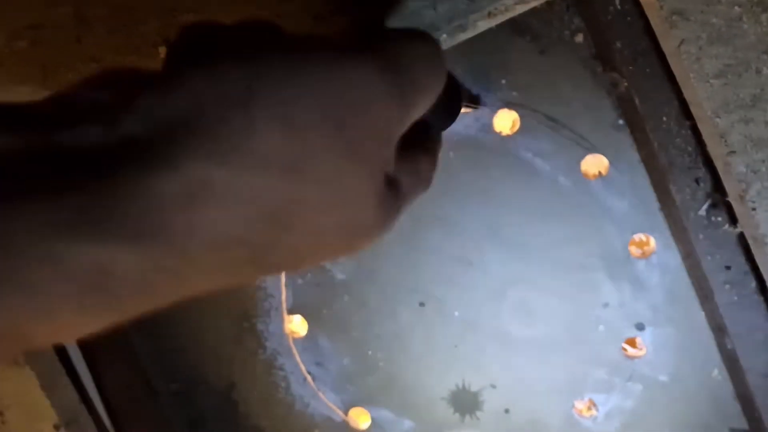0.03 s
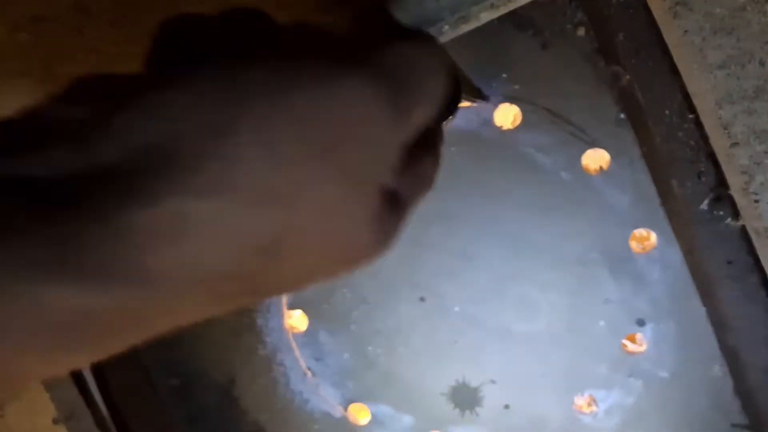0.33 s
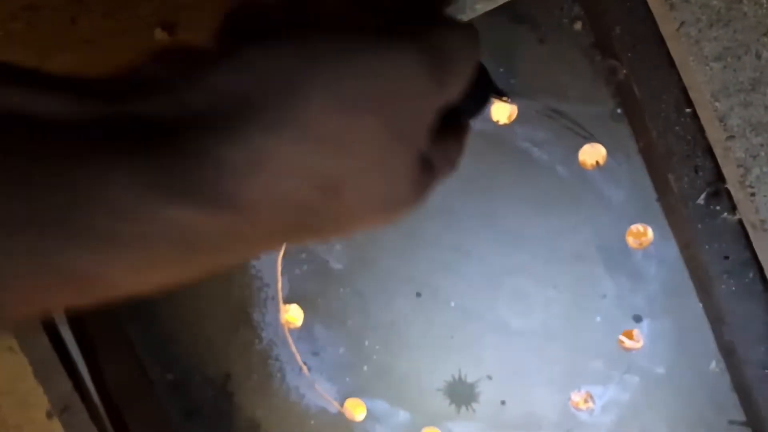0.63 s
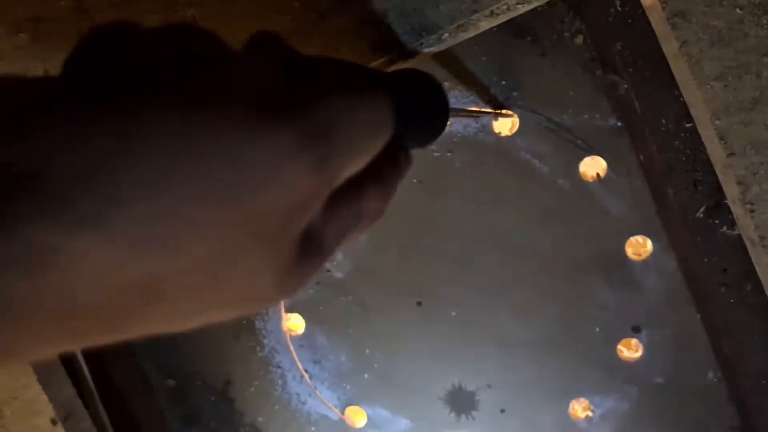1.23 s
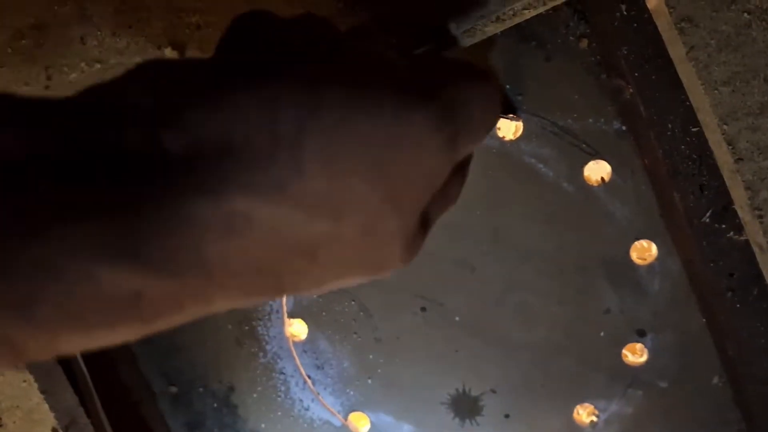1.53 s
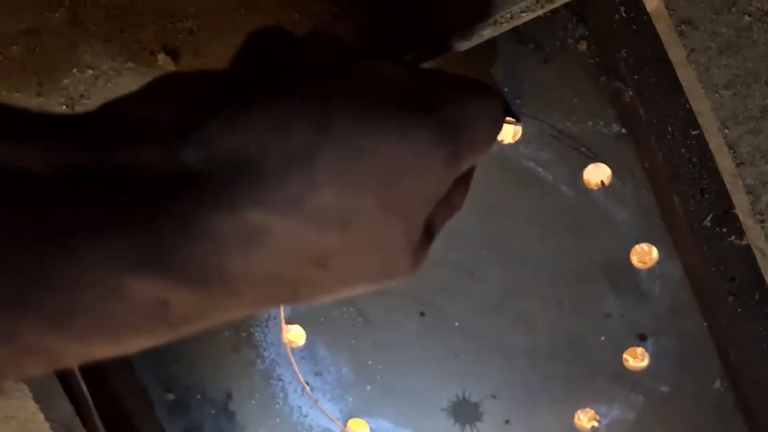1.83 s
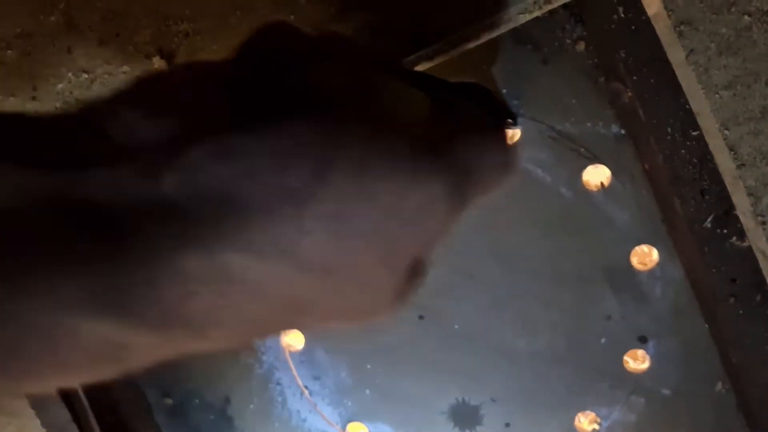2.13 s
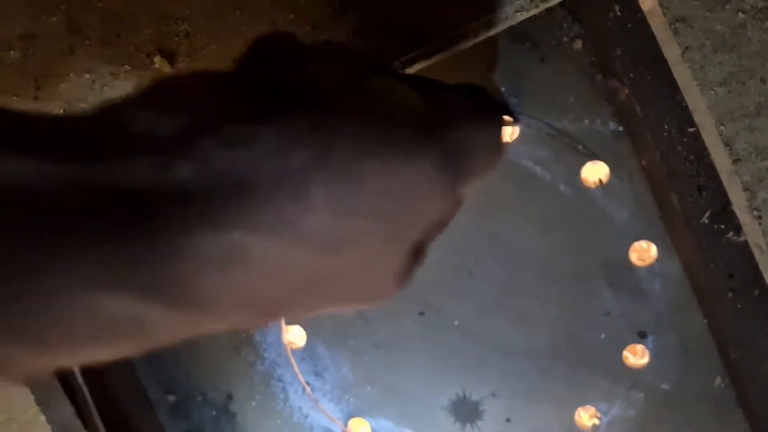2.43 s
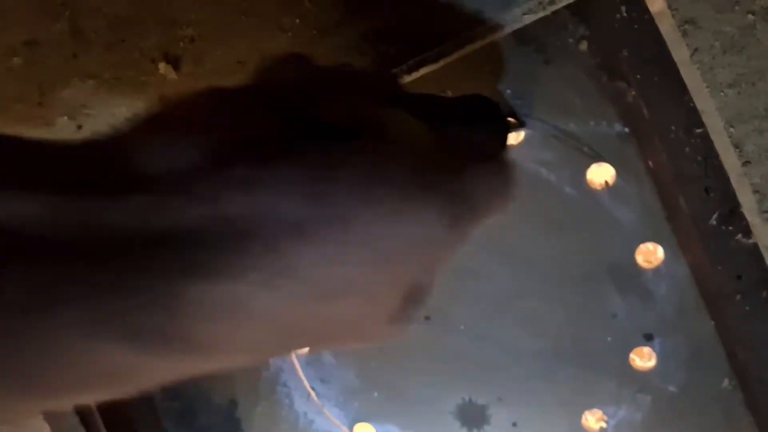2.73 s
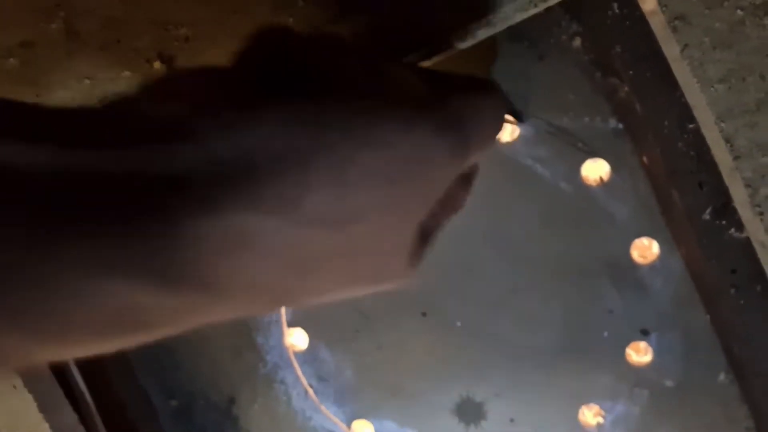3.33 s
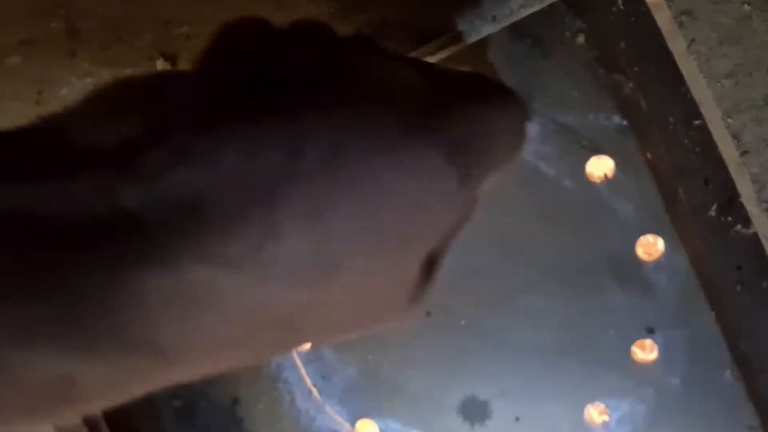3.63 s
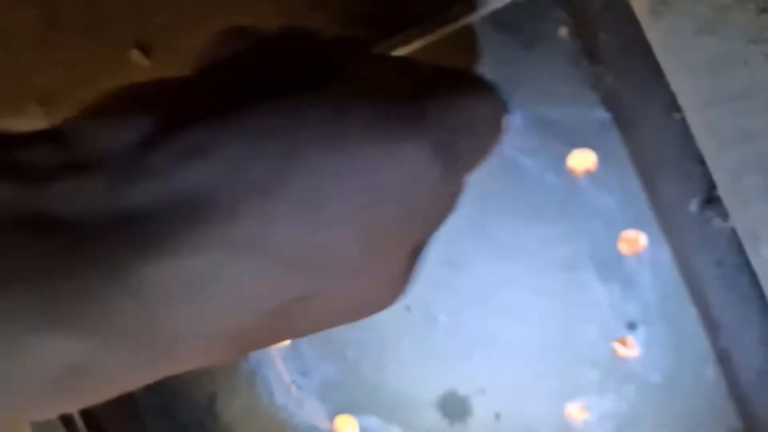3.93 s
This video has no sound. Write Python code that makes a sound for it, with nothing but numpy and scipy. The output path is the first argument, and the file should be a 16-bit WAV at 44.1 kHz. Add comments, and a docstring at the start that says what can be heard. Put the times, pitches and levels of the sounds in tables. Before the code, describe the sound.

A small hand saw rasps through a ceiling board close by, each short, uneven stroke crunching and making the panel boom. Knocks land around 0.3 and 0.4 seconds, and the blade snags with a click near 0.7. From 0.9 to 1.4 it slides back slowly, hissing faintly and ticking twice. Irregular strokes then continue until 4 seconds, with lighter knocks near 2.6 and 2.8, in a quiet, slightly echoing attic.

```python
"""Short, uneven strokes of a small hand saw tear through a ceiling board, close by in an attic.
Each catch of the teeth shakes the whole panel, crunches the board and sheds grit.
Now and then the saw knocks, or the blade snags with a click. About a second in, it is drawn slowly
back along the cut, hissing and ticking. A short echo and still attic air lie behind it."""
import sys
import numpy as np
from scipy import signal
from scipy.fft import rfft, irfft
from scipy.io import wavfile
from scipy.ndimage import uniform_filter1d

SR = 44100
rng = np.random.default_rng(int(sys.argv[2]) if len(sys.argv) > 2 else 0)


def master(y):
    """Save y as 16-bit WAV."""
    cut = np.clip(np.atleast_2d(y).T, -1, 1)
    pcm = np.round(cut * 32767)  # scale
    wavfile.write(sys.argv[1], SR, pcm.astype(np.int16))


N = 176400

# The saw, close to the microphone. Each row: start, hardest push and end in seconds,
# relative levels of grit, crunch and panel in dB, tooth catches per second at full force.
STROKES = [(-.05, 0, 0.087, -42, -34.5, -13, 82), (0.096, 0.113, .165, -49, -40.5, -19.5, 78.8),
           (0.246, 0.281, .33, -39, -30.5, -13, 84.7), (0.374, 0.418, .48, -38.5, -27, -13, 77.3),
           (.485, 0.528, 0.56, -46, -38, -18, 72), (0.539, 0.569, 0.62, -37.5, -33, -18.5, 95.3),
           (0.628, 0.671, 0.742, -45.5, -32.5, -19, 80), (0.739, 0.78, .87, -51, -39, -16.5, 72.8),
           (1.323, 1.347, 1.44, -60.5, -57, -56, 76), (1.412, 1.538, 1.606, -50, -41.5, -28.5, 77),
           (1.618, 1.653, 1.745, -56, -51, -31, 72), (1.751, 1.813, 1.896, -44.5, -37, -20.5, 79.5),
           (1.897, 1.947, 2.028, -44, -38.5, -17, 72), (2.059, 2.087, 2.126, -54, -42, -26.5, 68),
           (2.192, 2.231, 2.29, -45, -43.5, -18, 70), (2.291, 2.394, 2.425, -42.5, -33.5, -9, 73),
           (2.449, 2.514, 2.583, -45, -39.5, -13.5, 67.3), (2.6, 2.648, 2.722, -42, -31.5, -11, 80),
           (2.74, 2.805, 2.84, -41.5, -37.5, -12, 72), (2.868, 2.887, 2.913, -50, -41.5, -28, 66),
           (3.032, 3.056, 3.04, -47.5, -40, -21, 72.5), (3.074, 3.104, 3.143, -45, -39.5, -14, 68.5),
           (3.15, 3.239, 3.324, -41.5, -29, -10.5, 83.3), (3.294, 3.384, 3.435, -41.5, -36, -11, 76),
           (3.449, 3.48, 3.467, -46, -39, -30.5, 77), (3.598, 3.672, 3.68, -41, -35.5, -18, 81.4),
           (3.712, 3.724, 3.79, -46, -41.5, -22.5, 68), (3.742, 3.791, 3.848, -38, -27, -14.5, 82.4),
           (3.863, 3.941, 4.05, -41.5, -33.5, -15.5, 93)]
# Where the cut sits, mostly a little to the right. Each row: frequency in Hz, left over right in dB.
CUT_BALANCE = [(250, 7.5), (470, -7.5), (740, -3), (2000, -0.5), (4500, -3), (15000, -2.5)]
def sawing(grit_db=-6, crunch_db=-2, panel_db=1):
    """The strokes tear the board and shake it. Gives the sound at the cut and the panel's boom."""
    drive = np.zeros((3, N))
    for row in STROKES:
        add(drive, row[0], stroke(*row))
    grit_drive, crunch_drive, shake = drive
    cut = amp(grit_db) * grit(grit_drive) + amp(crunch_db) * crunch(crunch_drive)
    balance = sides(read(CUT_BALANCE, np.fft.rfftfreq(N, 1 / SR)))
    return irfft(rfft(cut) * balance, N), amp(panel_db) * shake


def stroke(start, hardest, end, grit_db, crunch_db, panel_db, rate, bite_s=.0036, spread_db=3.5):
    """Force swells and eases as teeth catch. Gives grit strength, crunch strength and panel motion."""
    t = start + np.arange(SR // 2) / SR
    progress = np.interp(t, [start, hardest, end], [0, .5, 1])
    force = np.maximum(np.sin(np.pi * progress), 0) ** .9
    jitter, size = rng.standard_normal((2, 60))
    teeth_passed = np.cumsum(rate * (.85 + .15 * force)) / SR
    at = np.searchsorted(teeth_passed, np.arange(len(size)) + .5 + .08 * jitter)
    catches = np.bincount(at, amp(spread_db * size), len(t) + 1)[:len(t)]
    # each catch tears for a moment, over steady scraping
    bite = signal.lfilter([1], [1, -np.exp(-1 / (bite_s * SR))], catches)
    bite /= np.sqrt(np.average(bite ** 2, weights=force) + 1e-12)
    upper = (rate / PANEL_MODES[0][0]) ** 3.6  # faster catches shake the upper modes harder
    shake = panel(catches * force ** 1.93, upper)
    shake /= np.sqrt(uniform_filter1d(shake ** 2, size=1300).max() + 1e-12)
    return np.array([amp(grit_db) * force ** .8 * (.75 + .25 * bite),
                     amp(crunch_db) * force ** 1.52 * (.55 + .45 * bite),
                     amp(panel_db) * shake])


# The ceiling panel's modes. Each row: frequency in Hz, level in dB, seconds to fall by 60 dB.
PANEL_MODES = [(69.93, 15.5, .19), (93, -0.5, .16), (120.4, 4.5, 0.28), (147.46, 2, .24), (243, -15, 0.18),
               (309.5, -10.5, 0.23)]
def panel(push, upper=1, soft_hz=293):
    """The panel's low modes ring after each soft push; upper scales all but the lowest."""
    t = np.arange(SR // 3) / SR
    shifts = 1 + .05 * rng.uniform(-1.08, 1, len(PANEL_MODES))  # the saw's pressure retunes the panel
    modes = [amp(db) * decay(t, t60) * np.sin(2 * np.pi * hz * shift * t)
             for (hz, db, t60), shift in zip(PANEL_MODES, shifts)]
    soft_push = signal.sosfilt(signal.butter(3, soft_hz, fs=SR, output="sos"), push)
    return signal.fftconvolve(soft_push, modes[0] + upper * sum(modes[1:]))[:len(push)]


# The board, right at the cut. Each row: frequency in Hz, level in dB.
CRUNCH_SPECTRUM = [(120, -20.5), (250, 3.5), (320, 5), (390, -21.5), (440, -21), (478, -1), (540, -8),
                   (610, 5), (675, 6), (780, -2), (860, -5.5), (940, -6), (1150, -11), (1350, -24.5),
                   (1520, -18), (1900, -29.5), (3500, -34)]
def crunch(strength, width=.58):
    """The board crumbles in dense clicks, spread between the ears by a very short scatter."""
    crumbs = strength * grains(per_s=2600, spread_db=2)
    return colour(crumbs + width * scatter(crumbs, t60=.0044), CRUNCH_SPECTRUM)


# Grit at the teeth, from close up. Each row: frequency in Hz, level in dB.
GRIT_SPECTRUM = [(300, -11), (1000, 3.5), (1500, 5), (1850, 3.5), (2350, 7), (3000, 1), (4400, 5.5),
                 (6100, -1.5), (8000, -1), (10500, -6.5), (13000, -8), (16000, -18)]
def grit(strength):
    """The teeth shed fine grains, a bright rasp that rings through the blade."""
    rasp = strength * mottle(fizz(grains(per_s=3300, spread_db=3.5), t60=.028))
    return blade(colour(rasp, GRIT_SPECTRUM))


# Broad resonances of the blade under load. Each entry: frequency in Hz, before the cut bends it.
BLADE_MODES = [1410, 2270, 3810, 4414, 5030, 5940, 7470]
def blade(rasp, ring_db=4, width_hz=160, jump=.06, glide_per_s=.5):
    """Each stroke pinches the steel at a new place: its resonances jump, then glide up or down."""
    t = np.arange(N) / SR
    bends = np.ones((len(BLADE_MODES), N))
    for k, (start, _, end, *_) in enumerate(STROKES):
        begun = t >= start
        travel = (-1) ** k * np.minimum(t[begun] - start, end - start)
        bends[:, begun] = 1 + jump * rng.standard_normal((len(BLADE_MODES), 1)) + glide_per_s * travel
    pole, ring = np.exp(-np.pi * width_hz / SR), 0
    for hz, bend in zip(BLADE_MODES, bends):
        carrier = np.exp(2j * np.pi * np.cumsum(hz * bend) / SR)
        envelope = signal.lfilter([1 - pole], [1, -pole], rasp / carrier + 1e-18)
        ring += 2 * (carrier * envelope).real
    return rasp + amp(ring_db) * ring


def mottle(rasp, depth_db=3.5):
    """Ever different teeth touch the board, so narrow patches of the rasp flare and fade."""
    spectra = signal.stft(rasp, nperseg=1024, noverlap=768)[2]
    patches = rng.standard_normal(spectra.shape[1:])
    for axis in (0, 1):
        patches = uniform_filter1d(patches, size=4, axis=axis)
    spectra *= amp(depth_db * unit(patches))
    return unit(signal.istft(spectra, nperseg=1024, noverlap=768)[1][:, :N])


# The saw knocks against the board, dead centre. Each row: start in seconds, peak level in dB.
KNOCKS = [(0.299, -3.5), (0.395, -4.5), (.649, -12), (2.642, -13), (2.843, -18.5)]
def knocks():
    """Single hard catches thump the panel and favour its upper modes."""
    out = np.zeros(N)
    thump = panel(signal.unit_impulse(SR // 3), upper=1.3)
    for start, db in KNOCKS:
        add(out, start, amp(db) * thump / abs(thump).max())
    return out


# Snags near the microphone. Each row: start in seconds, level in dB, treble tilt in dB per octave,
# left over right in dB.
SNAGS = [(0.58, -34, -6, 4), (0.595, -32, 16, -1), (.642, -36, -1.5, -6), (0.654, -32.5, 4, -2),
         (.661, -21.5, 2, -3.5), (2.098, -41, -1.5, -3), (2.661, -29, 4, -1), (2.79, -38, -1.5, 5),
         (2.942, -46.5, -2, -2), (3.058, -38, -2, 4), (3.647, -37, -3, 6)]
def snags():
    """Short cracks as the blade jerks free."""
    out = np.zeros((2, N))
    for start, db, tilt_db, lean_db in SNAGS:
        add(out, start, amp(db) * sides(lean_db) * crack(t60=.055, tilt_db=tilt_db))
    return out


# The blade's crack at close range. Each row: frequency in Hz, level in dB.
CRACK_SPECTRUM = [(300, -13), (700, 12.5), (1700, -3), (2300, 0.5), (2900, -6), (4300, 1), (5600, -1),
                  (7500, -1.5), (10000, -7.5), (16000, -14)]
def crack(t60, tilt_db=0):
    """The steel lets go in a dry, fast-dying burst of noise."""
    t = np.arange(SR // 10) / SR
    return colour(rng.standard_normal((2, len(t))) * decay(t, t60), CRACK_SPECTRUM, tilt_db)


# Ticks during the slow draw. Each row: start in seconds, level in dB.
TICKS = [(.993, -43), (1.257, -47)]
def ticks(ping_hz=2300, width_hz=160, ping_db=11):
    """A lone tooth plucks the free blade: a dry crack with a short, impure ping."""
    out = np.zeros((2, N))
    for start, db in TICKS:
        pluck = crack(t60=.06)
        ping = signal.lfilter(*signal.iirpeak(ping_hz, ping_hz / width_hz, fs=SR), pluck)
        add(out, start, amp(db) * (pluck + amp(ping_db) * ping))
    return out


# The flat of the blade rubbing, just left of centre. Each row: time in seconds, level in dB.
SLIDE_LEVELS = [(0, -44), (.16, -54), (.22, -64), (.5, -48), (.9, -55), (1.2, -57), (1.25, -68),
                (1.29, -80), (1.47, -63.5), (2.03, -50), (2.18, -59.5), (2.73, -59.5), (2.98, -84),
                (4, -69)]
# Its hiss. Each row: frequency in Hz, level in dB.
SLIDE_SPECTRUM = [(300, -6), (1200, 0), (2250, 2), (2800, -2), (3500, 9), (4600, -1), (5550, 2.5),
                  (6400, -4), (7300, 1.5), (8500, -5), (10800, -7), (12500, -1.5), (16000, -9)]
def slide(lean_db=2, turn_dip=.7, turn_s=.02):
    """Fine dry hiss of steel rubbing along the cut; it dips as the saw turns round."""
    dust = mottle(fizz(grains(per_s=5300, spread_db=2), t60=.044))
    t = np.arange(N) / SR
    dips = [1 - turn_dip * np.exp(-((t - start) / turn_s) ** 2) for start, *_ in STROKES]
    return np.prod(dips, axis=0) * level(SLIDE_LEVELS) * sides(lean_db) * colour(dust, SLIDE_SPECTRUM)


# A faint rumble beneath the saw. Each row: time in seconds, level in dB.
TREMBLE_LEVELS = [(.95, -45), (1.23, -41.5), (2.2, -41), (3, -48)]
def tremble():
    """The panel trembles under the resting hand."""
    return level(TREMBLE_LEVELS) * unit(panel(rng.standard_normal(N)))


# Room tone of the attic, all around the microphone. Each row: frequency in Hz, relative level in dB.
AIR_SPECTRUM = [(20, -14), (60, 28), (200, 2), (500, -1), (2000, -15), (16000, -33.5)]
def attic_air(db=-50):
    """Still air: a low, steady noise, mostly the same in both ears."""
    noise = rng.standard_normal(N) + .5 * rng.standard_normal((2, N))
    return amp(db) * unit(colour(noise, AIR_SPECTRUM))


def grains(per_s, spread_db):
    """Random clicks of uneven size."""
    size = amp(spread_db * np.minimum(rng.exponential(1, N), 4))
    return unit(size * rng.choice([-1, 1], N) * (rng.random(N) < per_s / SR))


def fizz(clicks, t60):
    """Each click becomes a tiny dying burst, different for each ear."""
    power = signal.lfilter([1], [1, -decay(2 / SR, t60)], clicks ** 2)
    return unit(np.sqrt(power) * rng.standard_normal((2, N)))


def scatter(x, t60):
    """A dying cloud of reflections, different for each ear."""
    t = np.arange(0, t60, 1 / SR)
    taps = rng.choice([-1., 1.], (SR, 2))[:len(t)].T * decay(t, t60)
    taps /= np.linalg.norm(taps[0])
    return signal.fftconvolve(np.atleast_2d(x), taps, axes=1)[:, :x.shape[-1]]


def colour(x, points, tilt_db=0, size=4096):
    """Causal filter of unit energy with the given spectrum, tilted per octave."""
    hz = abs(np.fft.fftfreq(size, 1 / SR))
    octaves = np.log2(np.maximum(hz, SR / 20) / SR)
    log_gain = np.log(amp(read(points, hz) + tilt_db * octaves))
    taps = np.fft.ifft(np.exp(np.conj(signal.hilbert(log_gain)))).real[:size // 2]
    return signal.fftconvolve(x, taps[None] / np.linalg.norm(taps), axes=1)[:, :x.shape[1]]


def read(points, hz):
    """Reads a spectrum on a log-frequency axis."""
    f, value = np.transpose(points)
    return np.interp(np.log(hz + 1), np.log(f), value)


def level(points):
    """A dB curve over time as gain."""
    return amp(np.interp(np.arange(N) / SR, *np.transpose(points)))


def add(mix, start, sound):
    """Mixes a sound in at a start in seconds."""
    at = round(start * SR)
    sound = sound[..., max(-at, 0):]
    part = mix[..., max(at, 0):][..., :sound.shape[-1]]
    part += sound[..., :part.shape[-1]]


def decay(t, t60):
    """Falls by 60 dB in t60 seconds."""
    return np.exp(-np.log(1000) * t / t60)


def sides(db):
    """Left and right gains, db apart."""
    return amp(np.array([[.5], [-.5]]) * db)


def amp(db):
    """Decibels to gain."""
    return 10 ** (np.asarray(db) / 20)


def unit(x):
    """Scales to rms 1."""
    return x / np.sqrt(np.mean(x ** 2) + 1e-20)


def scene(near_echo_db=-10, boom_echo_db=-20):
    """Saw and panel close by, then the short echo of the attic and still air."""
    cut, stroke_boom = sawing()
    near = cut + snags() + ticks() + slide()
    boom = stroke_boom + knocks()
    background = tremble() + attic_air()
    echo = scatter(amp(near_echo_db) * near + amp(boom_echo_db) * boom, t60=.22)
    return near + boom + echo + background


def record(dry, low_cut_hz=50, high_cut_hz=15850):
    """The microphone sheds the deepest bass; a steep filter takes off the highest treble."""
    thin = signal.sosfilt(signal.butter(2, low_cut_hz, "high", fs=SR, output="sos"), dry)
    taps = signal.firwin(511, high_cut_hz, window=("kaiser", 9), fs=SR)
    return signal.oaconvolve(thin, taps[None], "same")


dry = scene()
out = record(dry)
master(out)
```